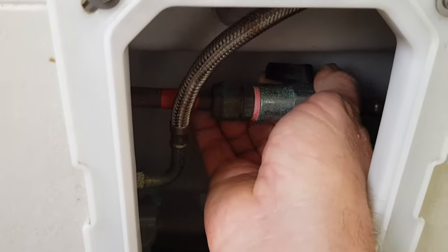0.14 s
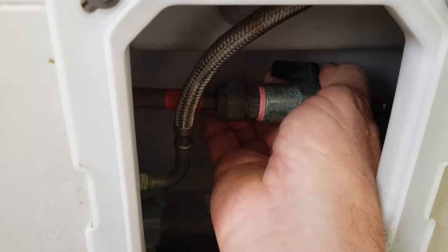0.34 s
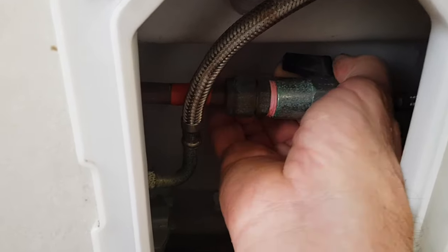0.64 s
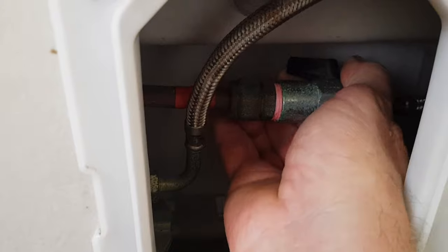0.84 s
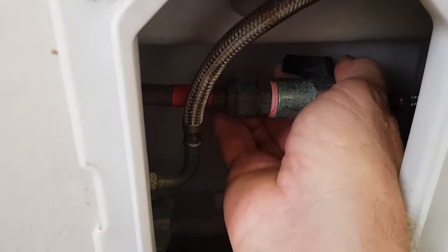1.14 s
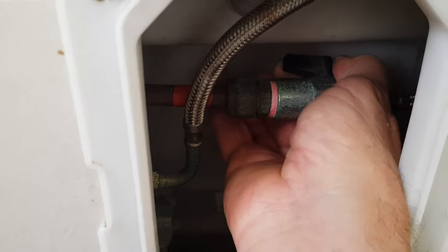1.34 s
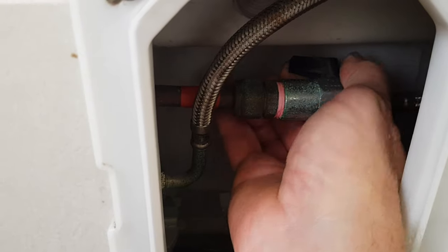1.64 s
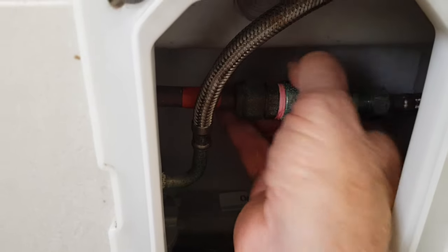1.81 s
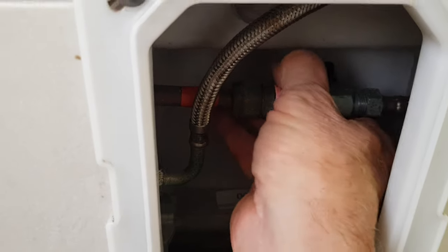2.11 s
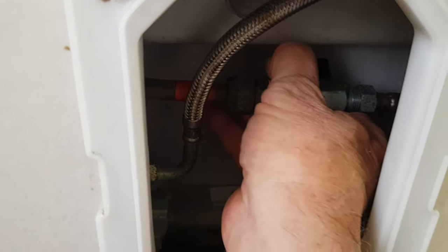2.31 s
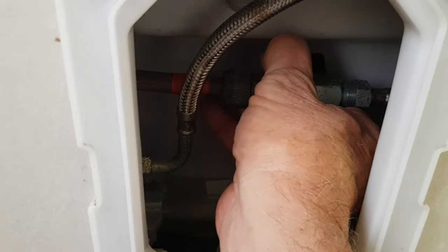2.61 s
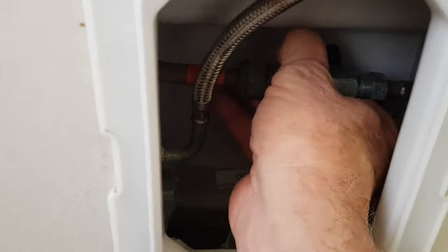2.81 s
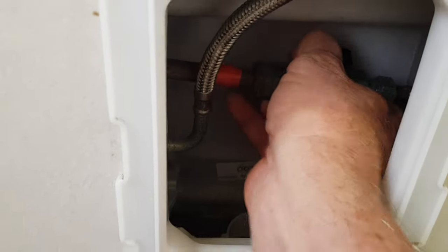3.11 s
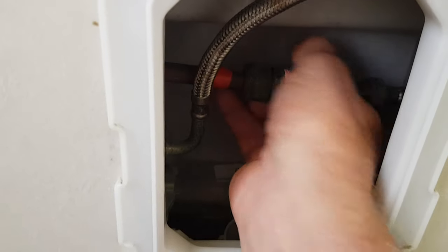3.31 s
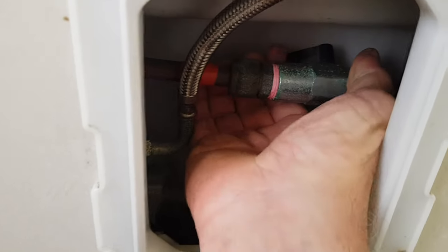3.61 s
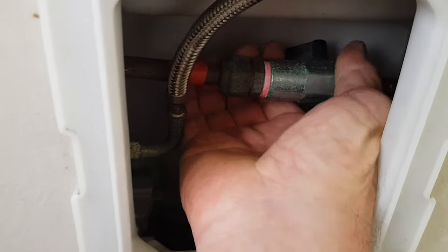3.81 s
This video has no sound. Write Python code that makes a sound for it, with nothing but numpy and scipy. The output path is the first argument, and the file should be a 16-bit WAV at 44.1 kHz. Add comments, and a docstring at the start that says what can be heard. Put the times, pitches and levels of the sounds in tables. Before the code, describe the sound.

Small tap handled up close in a quiet bathroom: faint water hiss first, irregular metallic clicks with hollow pipe knocks, a stronger thump, then a short hoarse rustle of arm against plastic, short room tail.

```python
"""A quiet room tone and a faint hiss of seeping water come first, then a dull knock.
A hand works a small isolation tap behind the open hatch of a concealed cistern, in a bathroom.
The lever and fitting click as noise bursts with ringing modes; the pipe knocks on the hollow housing,
a bank of low resonators; the arm rubs along the plastic frame in one fading rustle of random
micro-slips, with hoarse squeaks. A short diffuse tail answers the handling sounds."""
import sys
import numpy as np
from scipy import signal
from scipy.fft import rfft, irfft
from scipy.io import wavfile

SR = 44100
rng = np.random.default_rng(int(sys.argv[2]) if len(sys.argv) > 2 else 0)


def put_to_file(sound):
    """Save the sound as 16-bit audio at rate SR, in the file named by the first command-line argument."""
    columns = np.atleast_2d(sound).T  # one column per channel
    safe = np.clip(columns, -1, 1)
    whole_steps = np.round(safe * 32767)
    wavfile.write(sys.argv[1], SR, whole_steps.astype(np.int16))


N = 174195
T = np.arange(N) / SR
CUTOFF_HZ = 16000


def from_db(db):
    """Level law: decibels become an amplitude ratio."""
    return 10 ** (np.asarray(db) / 20)


def rms_one(x):
    """Power normalisation: scale to unit rms."""
    return x / np.sqrt(np.mean(x ** 2) + 1e-20)


def pan(db):
    """Interaural level difference: left and right gains, left minus right in dB."""
    return from_db([[db / 2], [-db / 2]]) / np.cosh(db * np.log(10) / 40)


def band(x, low_hz, high_hz):
    """Band limitation by a causal Butterworth band-pass."""
    high_hz = min(max(high_hz, low_hz + 10), .45 * SR)
    sos = signal.butter(2, [low_hz, high_hz], "band", fs=SR, output="sos")
    return signal.sosfilt(sos, x + 1e-18)


def curve(points):
    """Spectral interpolation: a table over log frequency, read at every bin."""
    hz, value = np.transpose(points)
    bin_hz = np.arange(N // 2 + 1) * SR / N
    return np.interp(np.log(bin_hz + 1), np.log(hz), value)


def widen(pair):
    """Interaural correlation: two unrelated signals become a pair alike in the bass, apart in the treble."""
    # correlation of left and right: (frequency [Hz], likeness [-1 to 1])
    likeness = [(60, 0.98), (290, 0.87), (640, 0.64), (1400, 0.31), (3100, 0), (7000, 0)]
    mid, side = rfft(pair)
    alike = np.clip(curve(likeness), -1, 1)
    return irfft(np.sqrt(1 + alike) * mid + np.sqrt(1 - alike) * side * [[1], [-1]], N)


def noise():
    """White noise: equal power at all frequencies, in stereo."""
    return widen(rng.standard_normal((2, N)))


def colour(x, spectrum):
    """Spectral shaping: weight a signal by a curve in dB; rms 1."""
    return rms_one(irfft(rfft(x) * from_db(curve(spectrum)), N))


def strikes(s, heights):
    """Impulsive excitation: one impulse per event."""
    out = np.zeros(N)
    at = np.clip((s * SR).astype(int), 0, N - 1)
    np.add.at(out, at, heights)
    return out


def fade(x, seconds):
    """Exponential decay: each impulse falls to 1/e in the given time."""
    return signal.lfilter([1], [1, -np.exp(-1 / (seconds * SR))], x + 1e-18)


def ring(x, hz, t60):
    """Damped resonance: a unit impulse starts a decaying sine of initial height near 1."""
    r = from_db(-60 / (t60 * SR))
    w = 2 * np.pi * hz / SR
    return signal.lfilter([0, np.sin(w)], [1, -2 * r * np.cos(w), r * r], x + 1e-18)


def swell(s, length_s):
    """Amplitude envelope: half a sine, a smooth rise and fall."""
    return np.sin(np.pi * np.clip((T - s) / length_s, 0, 1))


def room_tone():
    """Stationary background noise: a steady random sound weighted towards the bass."""
    # spectrum of the quiet room: (frequency [Hz], relative level [dB])
    room_spectrum = [(25, -29), (45, 5), (64, 1), (125, -4), (200, -16), (480, -17), (700, -24.5),
                     (1500, -33), (3100, -43.5), (5500, -36), (8300, -40), (12500, -33), (15500, -39)]
    return from_db(-52) * colour(noise(), room_spectrum)


def bathroom(x):
    """Diffuse reverberation: convolution with decaying noise, partly different at each ear."""
    t60_s, level_db, low_hz, high_hz = 0.3, -12.5, 300, 4330
    t = T[:SR]
    decay = from_db(-60 * t / t60_s) * (t > .008)  # the tail begins after 8 ms
    tail = band(noise(), low_hz, high_hz)[:, :SR] * decay
    response = rms_one(tail) / np.sqrt(SR)  # unit energy
    return from_db(level_db) * signal.fftconvolve(x, response, axes=1)[:, :N]


def seeping():
    """Flow noise: water seeping through the tap hisses in narrow bands as the gap changes."""
    # hisses: (start [s], length [s], level [dB], centre frequency [Hz])
    seeps = [(-0.08, 0.38, -61.5, 4480), (0.27, 0.26, -66.5, 2000), (0.813, 0.22, -65, 4450),
             (0.96, 0.3, -73, 1950)]
    half_width = .17 / 2  # share of the centre frequency
    out = 0
    for s, length, db, hz in seeps:
        hiss = rms_one(band(noise(), hz * (1 - half_width), hz * (1 + half_width)))
        out = out + from_db(db) * swell(s, length) * hiss
    return out


def ticks():
    """Impulsive transients: tiny, dry, broadband snaps close by."""
    # snaps: (time [s], envelope peak [dB], lower band edge [Hz])
    snaps = [(2.3597, -28, 9100), (2.4562, -40, 1450)]
    fade_s, pan_db = 0.00039, 32
    out = 0
    for s, db, hz in snaps:
        hit = from_db(db) * (np.arange(N) == int(s * SR))
        out = out + band(noise() * fade(hit, fade_s), hz, CUTOFF_HZ)
    return out * pan(pan_db)


def pings():
    """Modal cluster: close modes of the pipework ring briefly as narrow noise, the lower ones longer."""
    # short rings: (time [s], level [dB], frequency [Hz])
    ping_events = [(0.897, -42, 1547), (1.635, -52.5, 1630), (1.794, -48, 1440)]
    width_hz, fade_s, low_db = 260, .018, -15.5
    out = 0
    for s, db, hz in ping_events:
        hit = strikes(np.array([s]), from_db(db))
        cluster = rms_one(band(noise(), hz - width_hz / 2, hz + width_hz / 2))
        low_cluster = rms_one(band(noise(), hz - width_hz, hz))
        out = out + cluster * fade(hit, fade_s)
        out = out + low_cluster * fade(hit, 2 * fade_s) * from_db(low_db)
    return out


def slips():
    """Dry friction: dense, uneven micro-slips, with reflections from the walls of the recess."""
    # reflections: (delay [s], gain [ratio])
    recess_echoes = [(.0052, 0.19), (.0089, 0.19), (0.0153, 0.2), (.021, 0.27)]
    slips_per_s, spread_db, flutter_db = 1500, 3, 2.1
    sizes = from_db(spread_db * np.minimum(rng.exponential(1, (2, N)), 5))
    sizes = sizes * rng.choice([-1, 1], (2, N))
    x = widen(sizes * (rng.random((2, N)) < slips_per_s / SR))
    x = x + sum(gain * np.roll(x, int(s * SR), axis=1) for s, gain in recess_echoes)
    flutter = rms_one(band(rng.standard_normal(N), 28.3, 55.6))
    return x * from_db(flutter_db * flutter)


def scuffs():
    """Sliding friction: skin slides briefly on the metal, mostly around the clicks."""
    # finger slides: (start [s], length [s], level [dB])
    slides = [(0.46, 0.096, -49.5), (0.55, 0.023, -42), (0.698, 0.011, -40.5), (1.545, 0.066, -50.5),
              (1.604, 0.14, -51.5), (1.65, 0.18, -56.5), (1.769, 0.16, -47.5), (2.058, 0.08, -51),
              (2.502, 0.17, -56.5), (3.535, 0.15, -51)]
    # spectrum of skin on metal: (frequency [Hz], level per hertz [dB])
    scuff_spectrum = [(250, 9.5), (500, 7.5), (1500, -0.5), (2600, -9), (4200, -9), (6000, -5.5),
                      (8000, -14), (13000, -10), (16000, -28)]
    envelope = sum(from_db(db) * swell(s, length) for s, length, db in slides)
    return colour(slips(), scuff_spectrum) * envelope * pan(4.5)


def squeaks():
    """Stick-slip: as the arm drags over the plastic, slips bunch into rough, gliding tones."""
    # squeaks: (start [s], length [s], level [dB], first frequency [Hz], last frequency [Hz])
    glides = [(2.70, 0.08, -36.5, 1250, 1400), (2.755, 0.18, -40, 1300, 1560),
              (2.745, .13, -39.5, 2330, 1900), (2.93, .18, -50.5, 2760, 2920),
              (3.07, 0.304, -58, 2820, 2860)]
    out = 0
    for s, length, db, first_hz, last_hz in glides:
        hz = np.interp(T, [s, s + length], [first_hz, last_hz])
        phase = 2 * np.pi * np.cumsum(hz) / SR
        rough = rms_one(band(rng.standard_normal((2, N)), 15, 85))  # roughness band, Hz
        tone = rough[0] * np.cos(phase) + rough[1] * np.sin(phase)
        out = out + from_db(db) * swell(s, length) * tone
    return out * pan(3.5)


def frame_chatter():
    """Modal excitation by friction: uneven snags of the skin ring the frame's modes; rms 1."""
    # modes of the plastic frame: (frequency [Hz])
    frame_modes = [1190, 1380, 1569, 1905, 2064, 2317, 2840]
    snags_per_s, spread_db, t60_s = 70, 4, .09
    out = 0
    for hz in frame_modes:
        sizes = from_db(spread_db * np.minimum(rng.exponential(1, (2, N)), 3))
        snags = sizes * (rng.random((2, N)) < snags_per_s / SR)
        out = out + rms_one(ring(snags, hz, t60_s))
    return rms_one(widen(out))


def arm_rub():
    """Friction noise: slips rasp and make the frame chatter, with a fine swish above and a rumble below."""
    # course of the rub: (time [s], rasp [relative dB], swish [relative dB], rumble [relative dB])
    rub_course = [(2.63, -91, -68, -48.5), (2.652, -37, -68, -28), (2.72, -56, -45, -40),
                  (2.761, -37, -43, -35.5), (2.82, -32.5, -40, -36), (2.90, -37.5, -46, -39),
                  (2.98, -41, -51.5, -51), (3.07, -45.5, -51.5, -41.5), (3.19, -50, -57, -44.5),
                  (3.29, -50, -53, -43), (3.36, -48.5, -49, -42.5), (3.482, -56.5, -58.5, -48.5),
                  (3.609, -63, -58, -48.5), (3.70, -72, -73, -49.5), (3.95, -74, -78, -52.5)]
    # spectrum of the rasp: (frequency [Hz], level per hertz [dB])
    rasp_spectrum = [(350, -51), (600, -13), (683, -14), (824, -2), (947, -15), (1160, 0.5), (1350, -2.5),
                     (1950, -6), (2280, -6.5), (2540, -7.5), (2840, -6.5), (3720, -22), (4200, -17),
                     (5460, -19), (9240, -120)]
    # spectrum of the treble swish: (frequency [Hz], level per hertz [dB])
    swish_spectrum = [(2060, -64), (3500, -4), (4520, -6.5), (6130, -1.5), (7340, -7.5), (7960, -9.5),
                      (11100, -1), (15500, -11)]
    # spectrum of the low rumble: (frequency [Hz], level per hertz [dB])
    rumble_spectrum = [(35, -5), (70, -1), (130, 3.5), (300, -4), (500, -7), (800, -18), (1300, -45.5)]
    rasp_trim_db, chatter_db, swish_trim_db, rumble_trim_db = -1.5, -6, -2.5, 2
    s, *levels = np.transpose(rub_course)
    rasp_db, swish_db, rumble_db = [np.interp(T, s, level, left=-120) for level in levels]
    rasp = colour(slips(), rasp_spectrum) + from_db(chatter_db) * frame_chatter()
    rasp = from_db(rasp_db + rasp_trim_db) * rasp * pan(3)
    swish = from_db(swish_db + swish_trim_db) * colour(slips(), swish_spectrum) * pan(6)
    rumble = from_db(rumble_db + rumble_trim_db) * colour(slips(), rumble_spectrum)
    return rasp + swish + rumble


def pipe_knocks():
    """Modal synthesis: soft pushes, each with one rebound, ring the hollow housing over a dull thud."""
    # knocks of the pipe on the housing: (time [s], relative level [dB], most excited frequency [Hz])
    knocks = [(0.109, -43, 123), (0.141, -37.5, 126), (0.498, -34, 160), (0.564, -43, 160),
              (0.709, -34.5, 400), (.792, -28.5, 264), (.83, -33.5, 200), (1.077, -40, 212),
              (1.271, -35.5, 360), (1.554, -42, 154), (1.677, -19.5, 272), (1.711, -29.5, 121),
              (1.842, -28.5, 182), (1.885, -30, 215), (2.028, -42.5, 155), (2.091, -40, 453),
              (2.652, -22, 158), (2.679, -22.5, 93), (2.953, -22, 255), (3.223, -30, 123.5),
              (3.386, -37.5, 165), (3.578, -39, 152), (3.643, -39, 464), (3.719, -36.5, 259)]
    # modes of the hollow housing: (frequency [Hz], relative level [dB], decay time t60 [s])
    housing_modes = [(62, -8, 0.15), (87.6, -23, 0.34), (121.4, -0.5, 0.38), (164.1, -5, 0.34),
                     (199.3, -4.5, 0.28), (258.8, -7.5, 0.15), (293.55, -5, 0.37), (320.1, -5.5, 0.25),
                     (384, -15, 0.46), (481.3, -16, 0.42)]
    focus_db_per_octave, spread_db = 6.5, 1.5
    mean_rebound_s, rebound_db = .02, -6
    push_cutoff_hz, thud_db, thud_fade_s = 660, -18, .032
    s, db, focus_hz = np.transpose(knocks)
    out = 0
    for k, (hz, mode_db, t60) in enumerate(housing_modes):
        focus_loss_db = focus_db_per_octave * np.abs(np.log2(hz / focus_hz))
        spread = spread_db * rng.standard_normal(len(s))
        heights = from_db(db + mode_db - focus_loss_db + spread)
        rebound_s = s + mean_rebound_s * rng.uniform(0.5035, 1.5, len(s))
        pushes = strikes(s, heights) + strikes(rebound_s, heights * from_db(rebound_db))
        out = out + (-1) ** k * ring(pushes, hz, t60)  # alternate modes in opposite phase
    out = signal.sosfilt(signal.butter(2, push_cutoff_hz, fs=SR, output="sos"), out)
    thud_envelope = fade(strikes(s, from_db(db + thud_db)), thud_fade_s)
    thud = rms_one(band(noise(), 93, 503)) * thud_envelope
    return (out + thud) * pan(1)


def lever_clicks():
    """Impact excitation: each click is a noise crack with a short tail and rings the fitting's modes."""
    # clicks of lever and fitting: (time [s], relative level [dB], then the relative levels of the
    # low [dB], middle [dB], ring [dB] and treble [dB] bands)
    clicks = [(0.2606, -49.5, -19, -36, -14, -12), (0.465, -48.5, -1, -31, -11, 0.5),
              (0.4977, -44, -2.5, -10, -13.5, -17), (0.564, -29.5, -18, -12, -12, -12.5),
              (0.7061, -32, -8, -13, -9, -12), (0.7245, -41.5, -8.5, -18, -9, -14),
              (0.758, -27.5, -19.5, -6, -11.5, -11.5), (0.8205, -34.5, -20, -23, -34, -22),
              (1.2758, -35.5, -12.5, -18.5, -17.5, -9), (1.546, -48, -13, -31, -9.5, -12.5),
              (1.637, -50, -14, -24, -3, 5), (1.6578, -28.5, -14, -21, -10, -13),
              (1.822, -32.5, -15.5, -26, -16.5, -15), (1.683, -44, -2, -9, -22, -8),
              (2.0754, -52, -4, -28, -8, -21), (2.0901, -48.5, -18, -8, -22, -11),
              (2.3352, -39.5, -13, -9, -18, -14), (2.6877, -36.5, 4, 6, -19, -7.5),
              (3.0817, -24.5, -39, -7.5, -14, -14), (3.604, -45, -5, -9, -19, -26),
              (3.6418, -33.5, -17, -14, -9, -12.5), (3.7277, -48.5, -6, -30, -19, -26)]
    # low, middle, ring, treble and upper-middle bands of the crack:
    # (low edge [Hz], high edge [Hz], relative level [dB], left minus right [dB])
    click_bands = [(400, 1590, 5.5, 6.5), (2140, 3030, -2, 0), (5710, 6530, 4, 15), (8260, 14500, 4.5, 4),
                   (3160, 5930, -9.5, 3.5)]
    # modes of the fitting: (frequency [Hz], relative level [dB], decay time t60 [s])
    fitting_modes = [(1587, -3.5, 0.1), (2436, -5, 0.067), (3774, -10.5, 0.12), (5830, -2, 0.067),
                     (6500, -8, 0.025), (6830, -8, 0.034)]
    crack_db, crack_fade_s, rise_s = -7.5, 0.0066, .0009
    tail_db, tail_fade_s = -9, 0.027
    s, db, *colours = np.transpose(clicks)
    out = 0
    for (low_hz, high_hz, band_db, pan_db), own_db in zip(click_bands, colours + [0]):
        hits = strikes(s, from_db(db + own_db + band_db + crack_db))
        envelope = fade(hits, crack_fade_s) + from_db(tail_db) * fade(hits, tail_fade_s)
        envelope = fade(envelope, rise_s) / (rise_s * SR)  # softens the onset
        crack = band(noise() * envelope, low_hz, high_hz)
        width_gain = np.sqrt(SR / 2 / abs(high_hz - low_hz))  # makes up for the power outside the band
        out = out + crack * width_gain * pan(pan_db)
    for k, (hz, mode_db, t60) in enumerate(fitting_modes):
        nearest = min(k, 2)  # low, middle or ring band
        spread_db = rng.standard_normal((len(s), 2)).T
        heights = from_db(db + colours[nearest] + mode_db + spread_db)
        mode = np.array([ring(strikes(s, h), hz, t60) for h in heights])
        out = out + mode * pan(click_bands[nearest][3])
    return out


def scene():
    """Superposition: the background, the seeping water, the handling sounds and the room's answer."""
    handling = lever_clicks() + scuffs() + pipe_knocks() + pings() + arm_rub() + squeaks()
    return handling + bathroom(handling) + ticks() + seeping() + room_tone()


def record(dry):
    """Band limitation: a steep elliptic low-pass cuts the top."""
    return signal.sosfilt(signal.ellip(10, .2, 70, CUTOFF_HZ, fs=SR, output="sos"), dry)


dry = scene()
out = record(dry)
put_to_file(out)
```